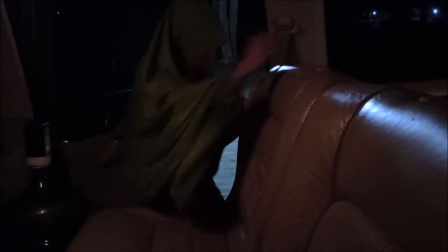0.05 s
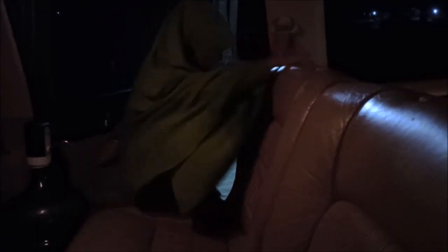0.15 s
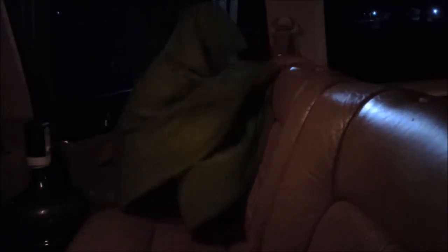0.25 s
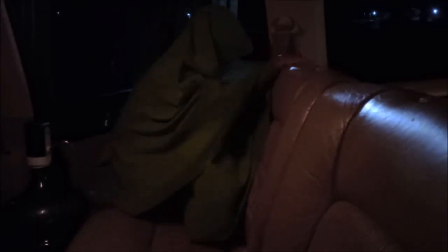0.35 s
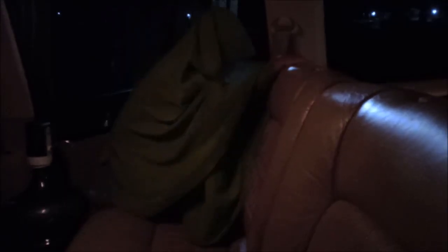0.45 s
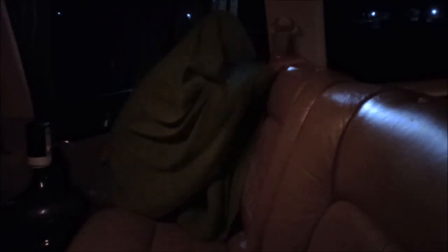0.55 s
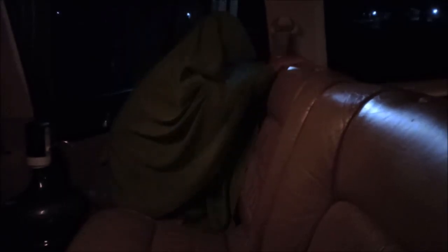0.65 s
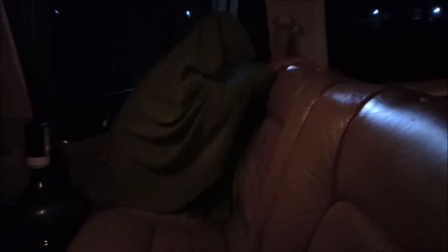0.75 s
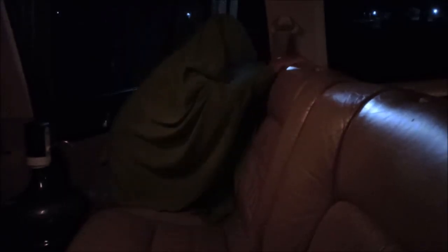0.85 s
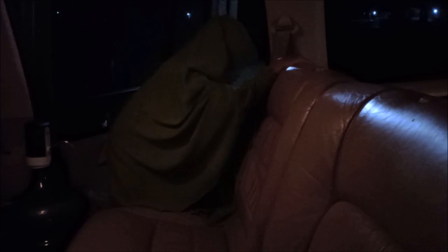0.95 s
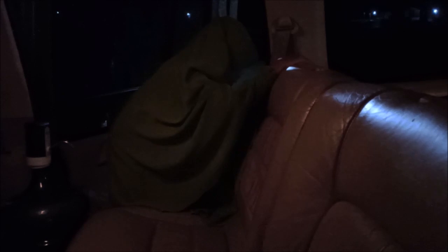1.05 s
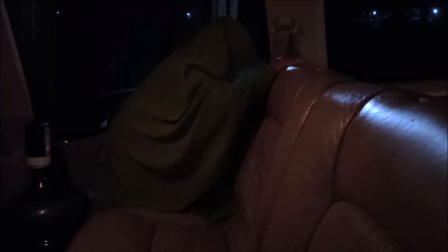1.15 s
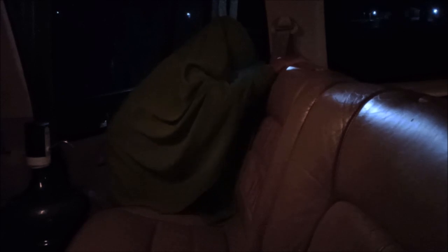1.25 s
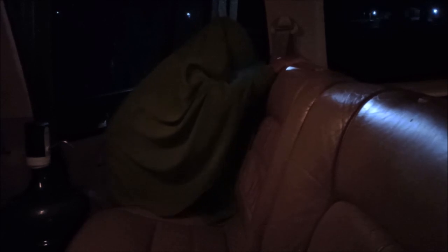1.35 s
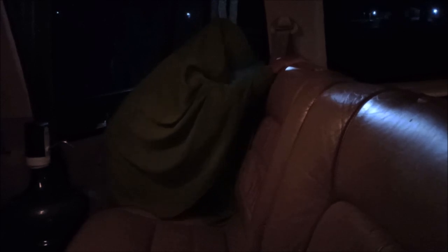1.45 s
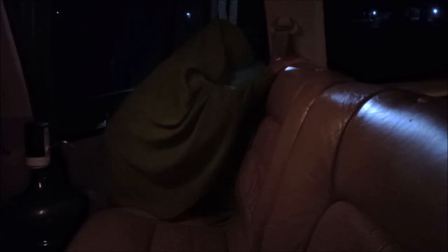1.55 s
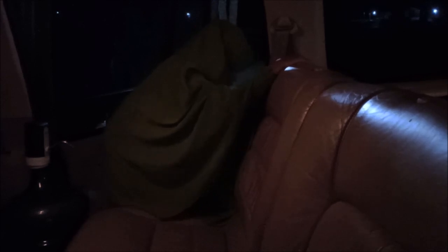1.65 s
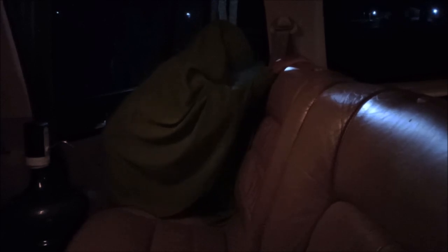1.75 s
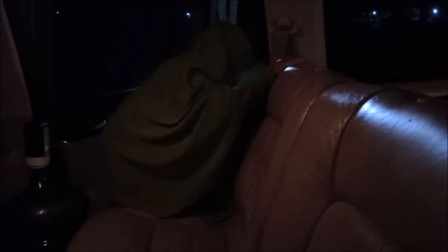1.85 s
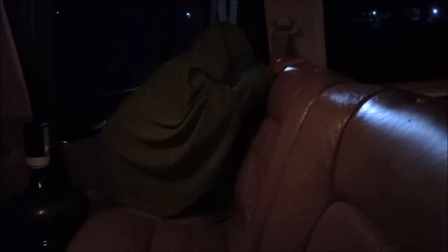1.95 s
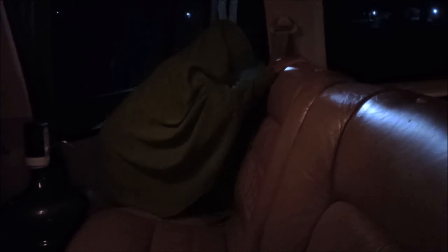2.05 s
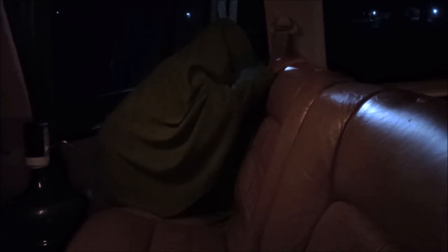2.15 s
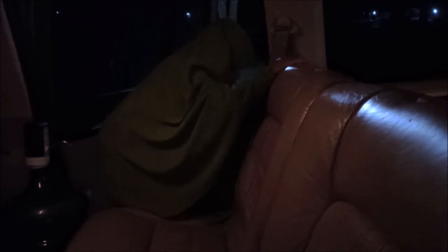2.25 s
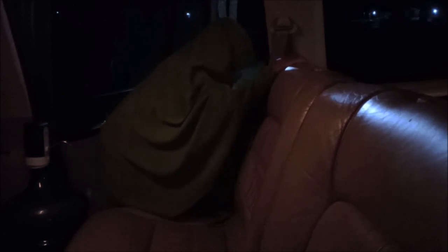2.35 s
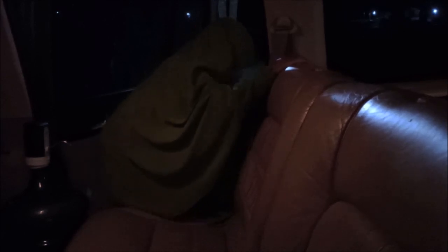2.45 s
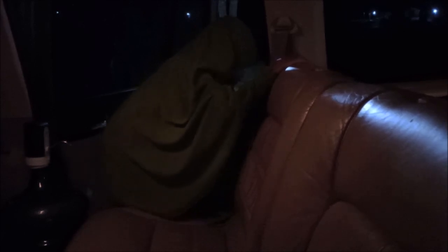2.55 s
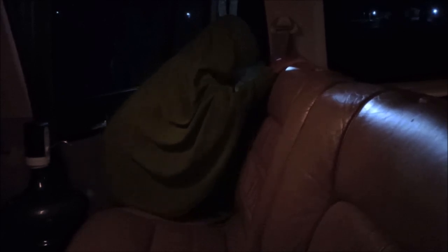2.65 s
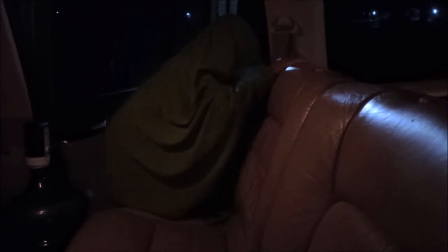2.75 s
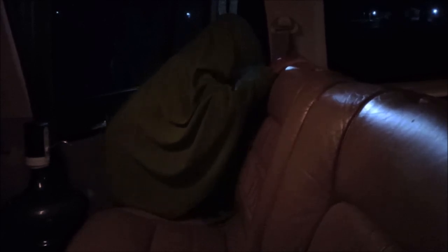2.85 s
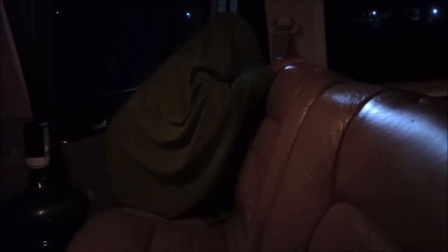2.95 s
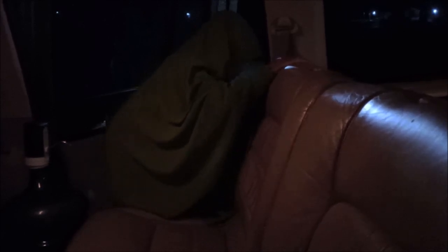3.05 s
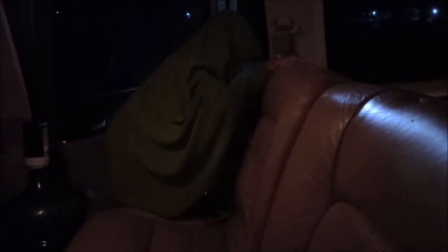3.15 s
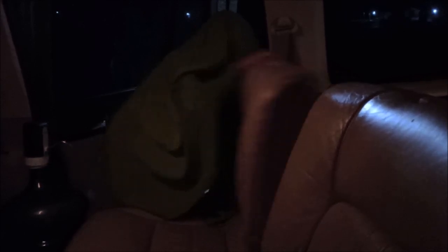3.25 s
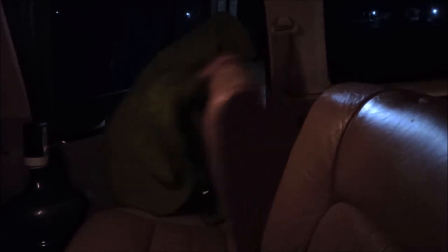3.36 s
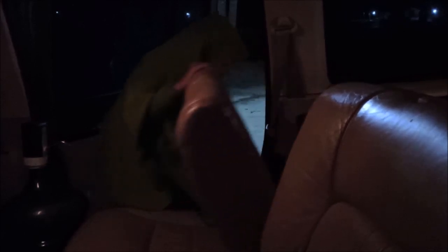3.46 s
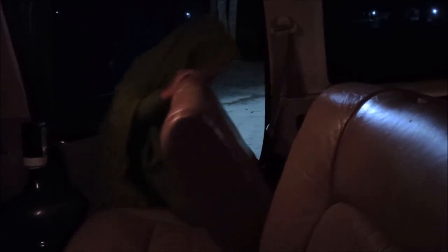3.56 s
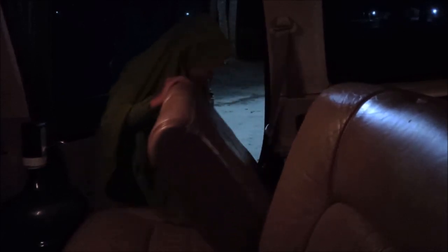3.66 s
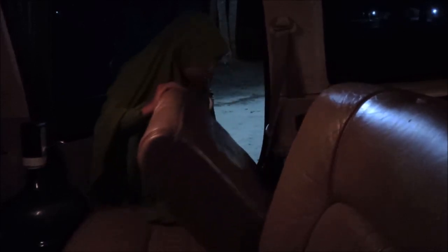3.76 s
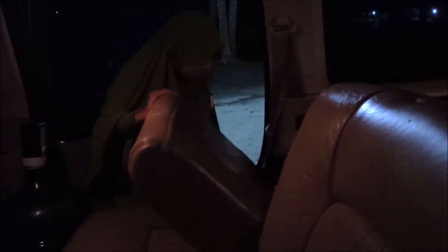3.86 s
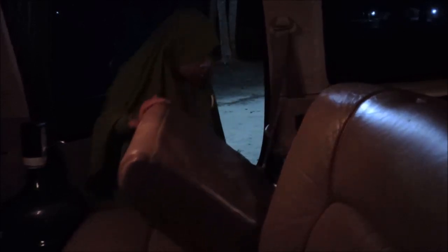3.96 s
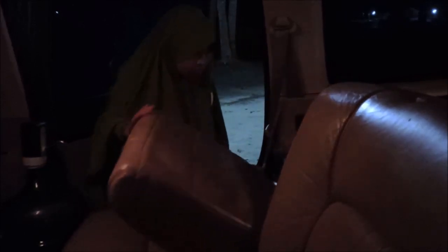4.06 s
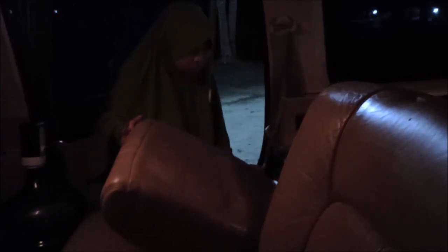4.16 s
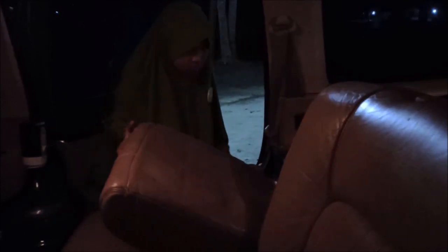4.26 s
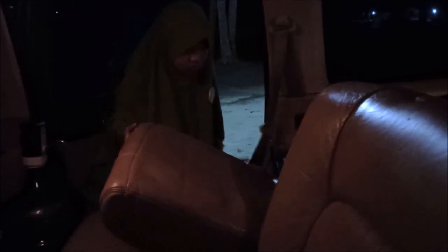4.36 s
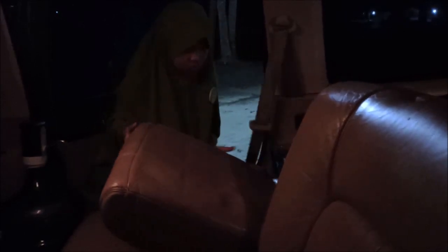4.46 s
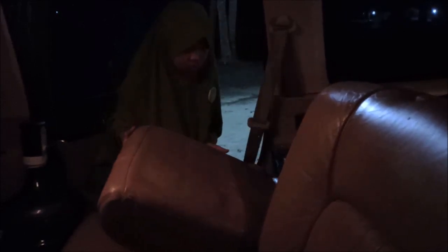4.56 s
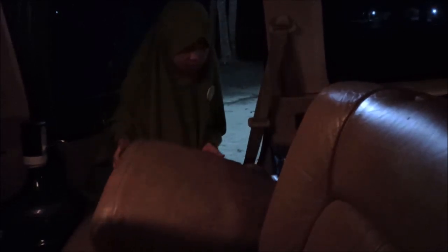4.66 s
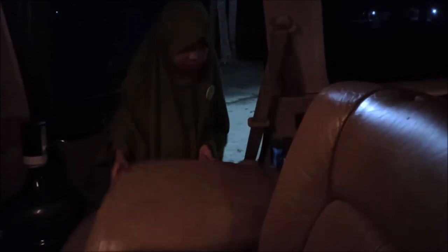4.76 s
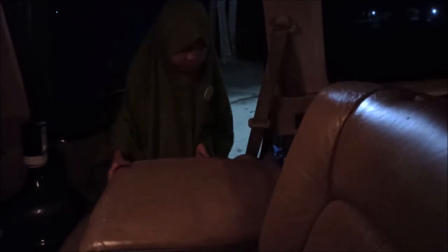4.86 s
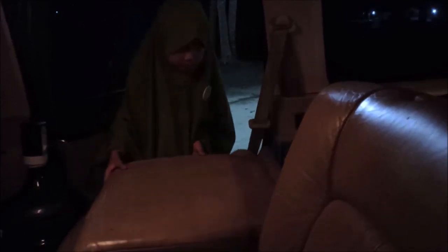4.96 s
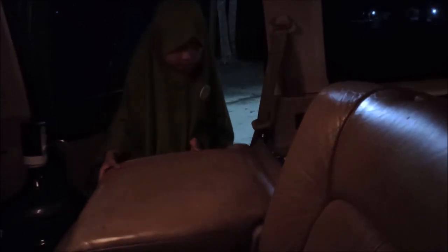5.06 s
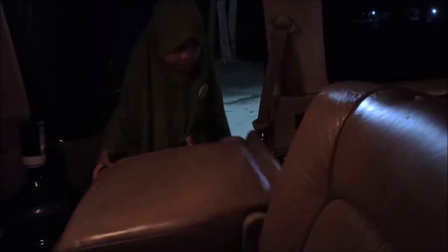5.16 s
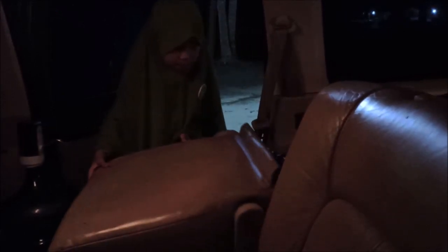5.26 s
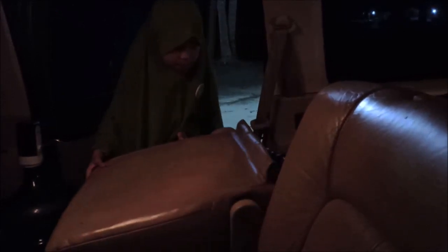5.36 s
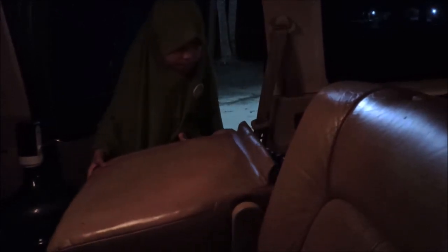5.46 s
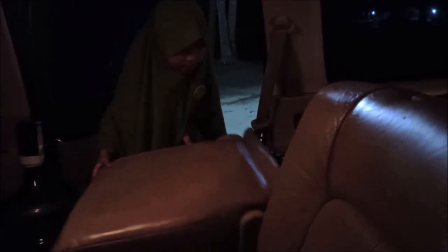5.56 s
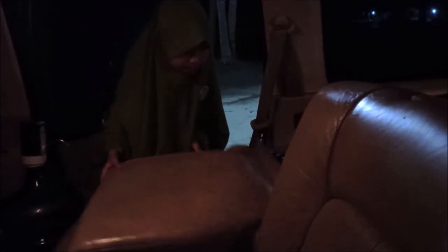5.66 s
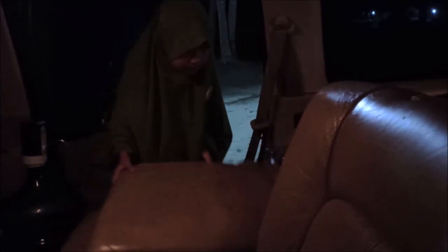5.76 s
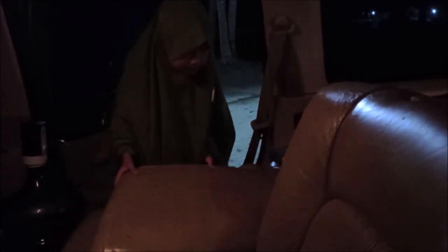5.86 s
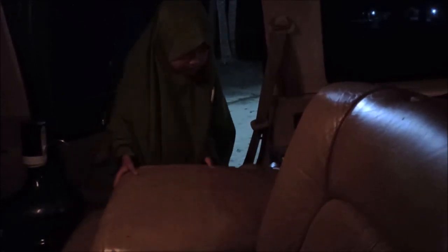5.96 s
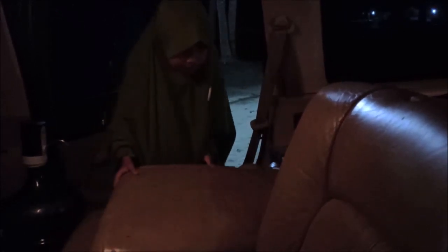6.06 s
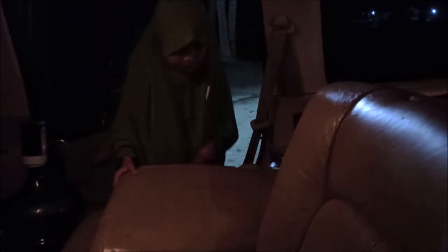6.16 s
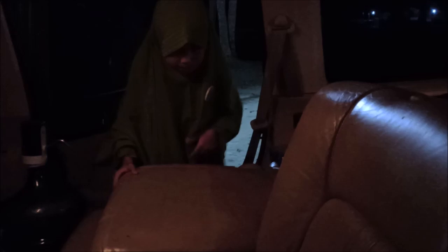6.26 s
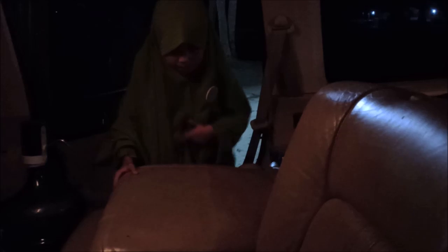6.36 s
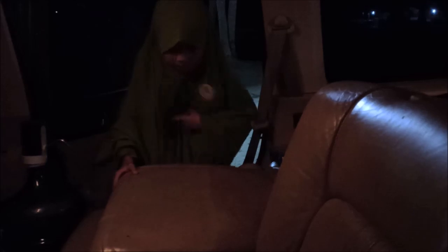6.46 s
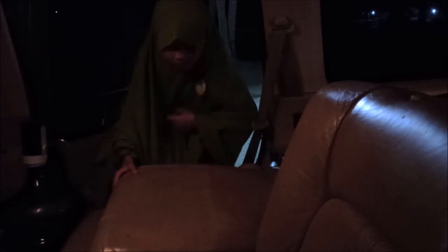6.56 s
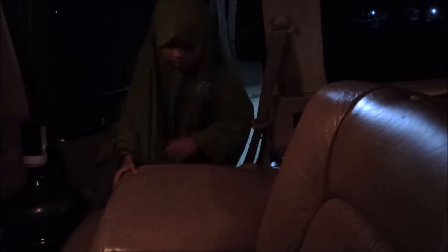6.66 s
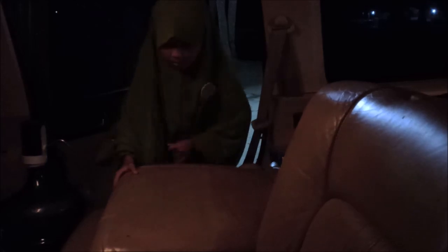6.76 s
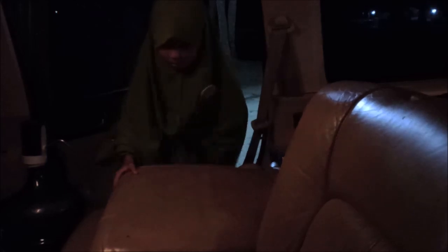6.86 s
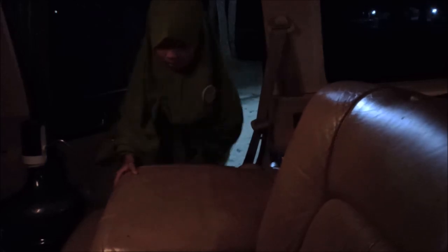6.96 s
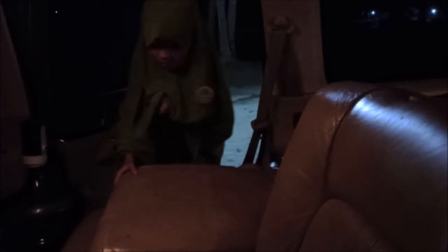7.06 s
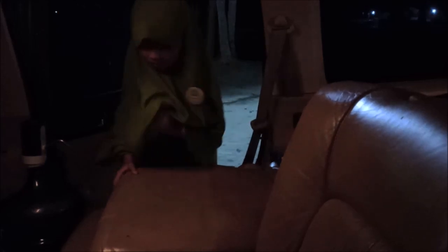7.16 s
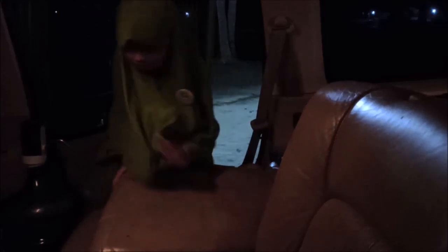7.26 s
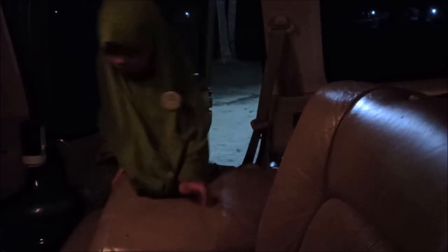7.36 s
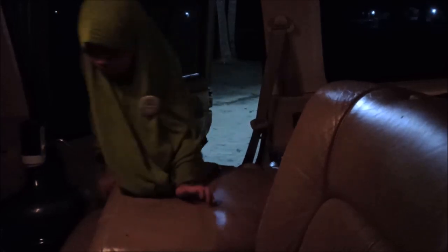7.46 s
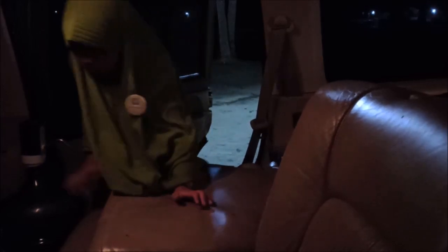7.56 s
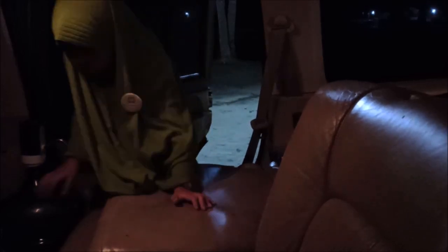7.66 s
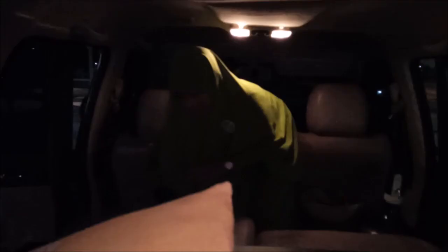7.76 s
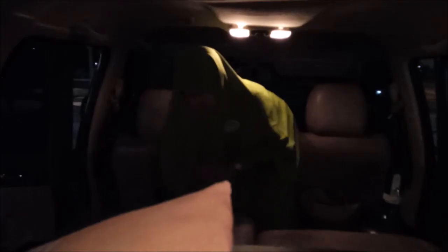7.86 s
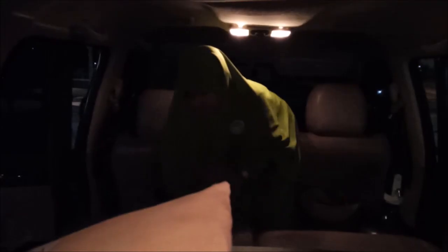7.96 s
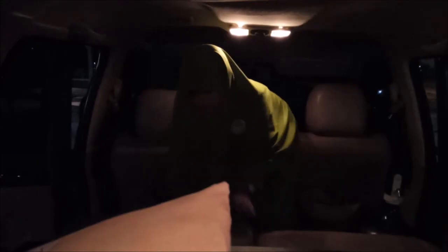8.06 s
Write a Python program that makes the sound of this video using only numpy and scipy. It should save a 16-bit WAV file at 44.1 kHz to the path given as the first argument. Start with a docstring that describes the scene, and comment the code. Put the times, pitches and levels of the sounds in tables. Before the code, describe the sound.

A strap rips open with crisp crackling snaps, then a padded car seat clunks and thumps as it is folded down by hand.

```python
"""Folding a car seat

Inside the cabin, a two-port microphone close to a car seat that is unstrapped, folded and pushed home by hand.
The strap rips and latches crack as bursts of banded noise with rings of the trim; the padded frame thumps as
a decaying sine and rings in its modes; leather and padding shift as uneven noise. Outside air (shaped noise)
and a thin drone (a wavering sine) come through the open door. The sound drops out for a moment near the end."""
import sys
import numpy as np
from scipy import signal
from scipy.fft import rfft, irfft, next_fast_len
from scipy.io import wavfile
from scipy.ndimage import uniform_filter1d

SR = 44100
rng = np.random.default_rng(int(sys.argv[2]) if len(sys.argv) > 2 else 0)


def dump(signal):
    """Clip the signal to [-1, 1] and save it as 16-bit WAV at the path in sys.argv[1]."""
    limited = np.clip(np.atleast_2d(signal).T, -1, 1)
    pcm = np.round(limited * 32767).astype(np.int16)
    wavfile.write(sys.argv[1], SR, pcm)


N = 357210
T = np.arange(N) / SR
EVENT_SIZE = 15000  # samples kept of each snap or knock

# Outside air through the open door, levels ahead of the overall tone colour:
# time_s, hum_db, mids_db, hiss_db
AIR_LEVELS = [(0, -50.5, -48.5, -48), (.6, -51, -51.5, -52), (1.1, -53.5, -52, -57.5),
              (1.9, -53.5, -52.5, -58), (2.7, -52.5, -60.5, -62.5), (3.4, -47.5, -64.5, -58),
              (3.7, -54, -65, -62.5), (4.1, -49, -58.5, -53), (4.55, -51.5, -61, -59.5),
              (5.2, -54, -54.5, -51), (5.8, -53, -53, -49.5), (6.2, -49.5, -56.5, -54.5),
              (6.9, -57, -59, -57), (7.6, -51, -64.5, -57.5), (8.1, -47.5, -58.5, -59)]
# Spectral shape of the hum: pitch_hz, relative_level_db (per Hz)
HUM_SHAPE = [(18, -44), (30, -15.5), (43, -17), (73, -8.5), (102, -1.5), (120, -2), (241, -13.5),
             (531, -30), (700, -23), (910, -42), (1540, -120)]
# Hands move the seat, or it settles after a blow; each move is eased in ahead of its start:
# start_s, held_s, t60_s, padding_level_db, leather_level_db
SEAT_MOVES = [(.16, 0.12, .6, -57.5, -51), (.56, 0.048, .5, -63, -48.5), (2.97, 0.019, .2, -42.5, -77),
              (3.18, 0.26, .3, -48.5, -52.5), (3.56, 0.048, .4, -51, -74), (3.72, 0.088, .5, -59.5, -59.5),
              (3.87, 0.13, .6, -52, -55.5), (4.18, 0.076, .3, -46.5, -68), (4.5, 0.13, .5, -61, -60),
              (4.89, 0.18, .3, -47, -49.5), (5.2, 0.34, .6, -59.5, -69), (5.6, 0.39, .3, -55, -58),
              (5.93, 0.018, .55, -26, -45.5), (6.43, 0.037, .7, -66, -62), (6.77, .03, .5, -54.5, -59),
              (7.43, 0.043, .7, -56, -58.5)]
# Snaps of strap, latch and trim, levels ahead of the trim rings and overall tone colour:
# time_s, level_db, mids_db, top_db, t60_s, mid_resonance_hz
SNAP_EVENTS = [(0.2244, -49, -11, 11, 0.3, 865), (.3135, -41, -17, 4, .07, 1500),
               (0.3356, -37, -8, -1.5, .061, 2600), (0.4807, -29.5, -12.5, 4.5, .07, 1960),
               (.5853, -49, -9.5, 6.5, 0.16, 2300), (.6435, -37, -10, 3.5, 0.18, 2000),
               (.6887, -24, -20.5, 2.5, 0.26, 2140), (0.7623, -22.5, -25.5, 10.5, 0.38, 2150),
               (.817, -15, -33.5, 0.5, 0.084, 2540), (0.8724, -23.5, -18, 11, .08, 3320),
               (0.893, -24, -20.5, 14, 0.19, 1610), (0.9348, -30.5, -22, 6, 0.16, 3290),
               (1.055, -27.5, -24, 7.5, 0.072, 940), (1.2705, -47, -19, 18.5, 0.035, 2180),
               (1.577, -45, -26, 11, 0.055, 1040), (1.854, -57, 7, -1, 0.13, 860),
               (2.145, -39.5, -6.5, 2.5, 0.069, 850), (2.3284, -50.5, -15, 1.5, .14, 2200),
               (2.387, -27.5, -15, 3, 0.084, 2880), (2.4094, -36.5, -8, 4, 0.056, 2600),
               (2.9125, -47.5, 2.5, -3, 0.1, 880), (2.9487, -40, 2, -4.5, .052, 790),
               (3.3434, -57, -5, 8, .21, 834), (3.443, -54.5, -3, 0, .053, 1070),
               (3.492, -48.5, -15, 4, 0.038, 1070), (3.697, -48.5, -1, -3.5, .052, 1800),
               (3.7768, -48, -8, -3.5, 0.041, 1160), (3.798, -43.5, -7, -7, .054, 2390),
               (3.9357, -47, -1.8, -10.5, 0.062, 810), (4.1589, -24.5, -4.5, -3.5, 0.073, 3020),
               (4.3262, -41.5, -27, -12, 0.033, 802), (4.5447, -60.5, 6, 8, .14, 1370),
               (4.666, -15.5, -5.5, -1.5, .063, 3510), (4.762, -21.5, -10.5, -3.5, 0.098, 2070),
               (4.8057, -22, -3.5, -0.5, 0.095, 880), (4.8551, -42, 0.5, -14, 0.18, 805),
               (4.8758, -36.5, -20, -3, 0.066, 930), (4.9726, -49.5, -1, -3.5, 0.12, 810),
               (5.06, -45.5, -8, 6, .14, 2950), (5.8419, -17.5, -4, -5, 0.11, 858),
               (5.8719, -16.5, -8.5, -3, 0.079, 3060), (5.994, -38, -1.5, 1, 0.044, 832),
               (6.4026, -56, 1, -1.5, .084, 1090), (6.623, -64, -10, 21.5, .041, 920),
               (6.7793, -49.5, -16, -1, 0.095, 891), (7.3, -56.5, -8, 5, 0.067, 2660),
               (7.4428, -56.5, 0, -7, 0.13, 802)]
# Narrow resonances of the plastic trim: pitch_hz, width_hz, added_level_db
TRIM_RINGS = [(1600, 27, -5.5), (2150, 40, -4), (4010, 270, -2.5), (4686, 50, 4), (6450, 280, -2),
              (6560, 60, 3), (6800, 80, 1.5), (7470, 150, 5), (8380, 100, 3), (12600, 190, -7),
              (16200, 250, -11)]
# Blows on the padded frame, levels ahead of the overall tone colour:
# time_s, thump_level_db, thump_hz, ring_over_thump_db, thump_t60_s, struck_near_hz
KNOCK_EVENTS = [(2.144, -41, 135, 0.5, .096, 851), (2.913, -19.5, 131.4, -13, 0.096, 398),
                (2.948, -19.5, 195.6, 4.5, .12, 444), (3.213, -40, 195, -9, .12, 231),
                (3.319, -31.5, 190, -14, 0.078, 231), (3.34, -30, 200, 7, 0.15, 403),
                (3.439, -41.5, 157, 6.5, .11, 393), (3.933, -26, 186, -4.5, 0.051, 231),
                (3.969, -41, 106.6, 10.5, 0.077, 406), (4.01, -48.5, 81.6, 13, .13, 447),
                (4.155, -20.5, 200.6, 10, .13, 340), (4.662, -25, 192, 9, 0.16, 300),
                (4.758, -17.5, 179, 9, .13, 270), (4.806, -18.5, 118.8, 6, 0.098, 861),
                (4.857, -8, 138.5, -3, 0.11, 231), (4.878, -17, 120, -8, .07, 345),
                (4.924, -25.5, 115.5, -7.5, 0.2, 248), (5.842, -22, 213, 14.5, 0.15, 869),
                (5.861, -12, 101.5, -5.5, 0.061, 719), (5.896, -14.5, 103, -1.5, .08, 237),
                (5.928, -23, 109.4, -4, 0.27, 231), (5.989, -26.5, 115, 4, 0.096, 256),
                (6.403, -39.5, 132.6, 5, .074, 409), (6.769, -45.5, 103, 6, 0.12, 347),
                (7.459, -49.5, 96, -5, .13, 412), (8.035, -30, 136, -5.5, .18, 371),
                (8.074, -29, 115, -13, 0.09, 231)]
# Frame modes, varied a little at each blow: pitch_hz, relative_level_db, t60_s
FRAME_MODES = [(175, 1.5, 0.087), (240.6, 3.5, 0.061), (283, 0, 0.078), (344.5, 1.5, 0.047),
               (401, -1.5, 0.083), (469, -4, 0.051), (593, -9.5, 0.1), (641, -4.5, 0.057),
               (775, -10, 0.059), (873, -12, 0.059), (974, -15, 0.045), (1353, -13, 0.066)]
# Overall tone colour: pitch_hz, gain_db
TONE_COLOUR = [(30, -10.5), (50, -19.5), (66, -1), (100, -1), (3600, 1), (4750, 1), (5000, -7), (5900, -2),
               (6400, 4), (7500, 5.5), (8500, -1.5), (9100, -29.5), (11300, -36), (11600, -7.5),
               (15400, -8), (16100, -34)]

MOVE_ATTACK_S = 0.032
PADDING_REST_DB, LEATHER_REST_DB = -64.5, -67
SNAP_RISE_S, PUSH_S = 0.0027, 0.003  # time constants
# A thin steady tone, perhaps a far motor; the attack ends at the start time
DRONE_HZ, DRONE_DB = 98.5, -53
DRONE_START_S, DRONE_HELD_S, DRONE_ATTACK_S = 5.3, 2.47, 5.0
# The strap tearing free
RIP_START_S, RIP_HELD_S, RIP_ATTACK_S, RIP_T60_S, RIP_DB = 0.703, 0.25, 0.03, 0.21, -29
DROPOUT_START_S, DROPOUT_END_S = 7.795, 7.860
TOP_HZ = 16300


def undb(db):
    """Decibels to linear gain."""
    return 10 ** (np.asarray(db) / 20)


def band(x, lo_hz, hi_hz):
    """Keep the sound between two frequencies."""
    return signal.sosfilt(signal.butter(2, [lo_hz, hi_hz], "bandpass", fs=SR, output="sos"), x)


def unit(x):
    """Scale to an RMS of 1 over both ports."""
    return x / np.sqrt(np.mean(x ** 2))


def colour(x, points):
    """Apply the gain of (Hz, dB) points joined on a log-frequency axis."""
    hz, db = np.transpose(points)
    size = next_fast_len(N)
    f = np.maximum(np.arange(size // 2 + 1) * SR / size, 1)
    gain = undb(np.interp(np.log(f), np.log(hz), db))
    return irfft(rfft(x, size) * gain, size)[..., :N]


def walk(rate, size=N):
    """Wander through random levels, rate of them a second, smoothed twice; spread near 0.67."""
    step = int(SR / rate)
    held = rng.standard_normal(size)[np.arange(size) // step]
    return 0.9 * uniform_filter1d(uniform_filter1d(held, step), step)


def ports(size, alike, lag_s, grain_db=0.):
    """Noise at both ports: a shared part that reaches the left one lag_s later, and a part of their own."""
    grit = undb(grain_db * rng.exponential(size=size))
    shared = grit * rng.standard_normal(size)
    own = grit * rng.standard_normal((2, size))
    both = np.array([np.roll(shared, int(round(lag_s * SR))), shared])
    return unit(np.sqrt(alike) * both + np.sqrt(1 - alike) * own)


def sides(pan_db):
    """Left and right gains that differ by pan_db, positive to the left."""
    return undb(np.array([[pan_db], [-pan_db]]) / 2)


def add(out, s, x):
    """Lay an event into the scene from time s."""
    i = int(s * SR)
    out[:, i:i + x.shape[1]] += x[:, :N - i]


def fade(t, rise, t60):
    """Gain that rises quickly, then decays by 60 dB per t60."""
    decay = np.exp(-np.log(1000) * t / max(t60, .01))
    return (1 - np.exp(-t / max(rise, 1e-4))) ** 2 * decay


def swell(start, held, attack, t60):
    """Gain that eases in before the start, holds, then dies away."""
    rise = np.clip((T - start) / max(attack, .001) + 1, 0, 1) ** 2
    return rise * undb(-60 * np.maximum(T - start - held, 0) / max(t60, .01))


def air():
    """Outside air: a wavering hum that is alike at both ports, broad mids and a smooth hiss."""
    time_s, *columns = np.transpose(AIR_LEVELS)
    hum_db, mids_db, hiss_db = (np.interp(T, time_s, c) for c in columns)
    hum = unit(colour(ports(N, 0.96, 0), HUM_SHAPE)) * undb(hum_db + 1.2 * walk(6))
    mids = unit(band(ports(N, 0.14, 0.00045), 350, 2530)) * undb(mids_db + 1.77 * walk(5.1))
    hiss = unit(band(ports(N, 0.095, 0.00043), 3200, 15500)) * undb(hiss_db + 0.8 * walk(7.7))
    return hum + mids + hiss * sides(-4.3)


def shifting():
    """Uneven stick-slip of padding works the frame; leather faces hiss on each other."""
    padding_gain, leather_gain = undb(PADDING_REST_DB), undb(LEATHER_REST_DB)
    for start, held, t60, padding_db, leather_db in SEAT_MOVES:
        move = swell(start, held, MOVE_ATTACK_S, t60)
        padding_gain = padding_gain + undb(padding_db) * move
        leather_gain = leather_gain + undb(leather_db) * move
    slips = ports(N, 0.76, 0, grain_db=2.5) * undb(2.2 * walk(30))
    body = colour(slips, [(60, -21.5), (130, 6.5), (300, -3.5), (450, -3.5),
                          (850, -12.5), (1300, -18.0), (3000, -35.5)])
    rub = band(ports(N, 0.49, 3e-4, grain_db=2.5) * undb(2.7 * walk(27)), 3500, 16000)
    return padding_gain * unit(body) + leather_gain * unit(rub)


def spray(size, mids_db, top_db, ring_hz):
    """Dense tiny breaks ring the part that snaps; the phone's body shades the left port in the highest treble."""
    grit = ports(size, 0.35, 4.2e-4, grain_db=2.0) * undb(1.6 * walk(250, size=size))
    resonance = unit(band(grit, 0.971 * ring_hz, 1.108 * ring_hz)) * undb(1.5)
    mids = resonance + undb(1.0) * unit(band(grit, 600, 2600))
    low_treble = unit(band(grit, 4030, 5880)) * sides(-2.0) * undb(-3.0)
    treble = unit(band(grit, 6920, 10600)) * sides(-2.5) * undb(-2.5)
    top = unit(band(grit, 10200, 17000)) * sides(-6.0)
    return undb(mids_db) * mids * sides(1.7) + low_treble + treble + undb(top_db) * top


def snaps():
    """Each snap is a spray that thins out; the cabin lining keeps a fainter tail."""
    out, t = np.zeros((2, N)), T[:EVENT_SIZE]
    tail = undb(-25.0) * fade(t, 0.012, 0.37)
    for s, db, mids_db, top_db, t60, ring_hz in SNAP_EVENTS:
        burst = fade(t, SNAP_RISE_S, t60)
        shape = burst / burst.max() + tail
        # begin a little early, so that the rise falls on the listed time
        add(out, s - .003, undb(db) * spray(EVENT_SIZE, mids_db, top_db, ring_hz) * shape)
    return out


def trim(x):
    """The panels around add their narrow rings to the snaps and the rip."""
    rung = x
    for hz, width, db in TRIM_RINGS:
        b, a = signal.iirpeak(hz, hz / width, fs=SR)
        rung = rung + undb(db) * signal.lfilter(b, a, x)
    return rung


def drone():
    """A near sine that comes up as the folded backrest clears the doorway; it wavers a little."""
    pitch_hz = DRONE_HZ * (1 + .012 * walk(5))
    tone = np.sqrt(2) * np.sin(2 * np.pi * np.cumsum(pitch_hz) / SR)
    level = undb(DRONE_DB + 1.5 * walk(8))
    return tone * swell(DRONE_START_S, DRONE_HELD_S, DRONE_ATTACK_S, .1) * level


def rip():
    """Hooks letting go in a ragged stream under the louder snaps of the strap."""
    pull = swell(RIP_START_S, RIP_HELD_S, RIP_ATTACK_S, RIP_T60_S)
    return pull * spray(N, -21, 1, 1930) * undb(RIP_DB + 5.0 * walk(70.4))


def frame_modes(t, near_hz):
    """Decaying frame modes, weaker by 7 dB per octave away from the struck part."""
    modes = 0
    for hz, mode_db, t60 in FRAME_MODES:
        level_chance, pitch_chance, phase = rng.standard_normal(3)
        reach_db = -7 * abs(np.log2(hz / near_hz))
        level = undb(mode_db + reach_db + 2.6 * level_chance)
        tone = np.sin(2 * np.pi * hz * (1 + 0.012 * pitch_chance) * t + phase)
        modes = modes + level * tone * fade(t, 0, t60)
    return modes


def knocks():
    """A soft push swings the padded mass; a short rattle of contacts rings the frame modes."""
    out, t = np.zeros((2, N)), T[:EVENT_SIZE]
    for s, db, hz, ring_db, t60, near_hz in KNOCK_EVENTS:
        sharp = 1 + 0.12 * np.exp(-t / 0.0068)  # the thump starts 12 % sharp
        thump = np.sin(2 * np.pi * hz * t * sharp) * fade(t, PUSH_S, t60)
        modes = frame_modes(t, near_hz)
        contacts = ports(EVENT_SIZE, 0.88, 0, grain_db=3.0) * fade(t, .5 * PUSH_S, 0.082)
        ring = signal.fftconvolve(contacts, modes[None])[:, :EVENT_SIZE]
        blow = thump / thump.max() + undb(ring_db) * ring / np.abs(ring).max()
        add(out, s - .002, undb(db) * sides(1.6) * blow)
    return out


def scene():
    """Everything that reaches the microphone."""
    return air() + shifting() + trim(snaps() + rip()) + drone() + knocks()


def record(dry):
    """Overall tone colour, rounded peaks, a brief dropout after which the sound eases back, and the cut at the top."""
    ceiling = .8
    rounded = ceiling * np.tanh(colour(dry, TONE_COLOUR) / ceiling)
    back = undb(-12 * np.exp(-np.maximum(T - DROPOUT_END_S, 0) / 0.078))
    gate = np.where(T < DROPOUT_START_S, 1, np.where(T < DROPOUT_END_S, undb(-46.5), back))
    cut = signal.ellip(12, .2, 80, TOP_HZ, fs=SR, output="sos")
    return signal.sosfilt(cut, gate * rounded)


dry = scene()
out = record(dry)
dump(out)
```